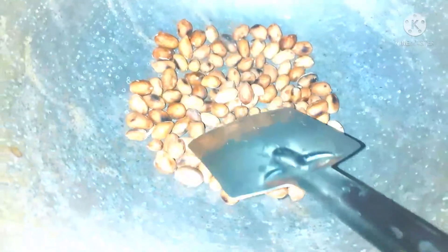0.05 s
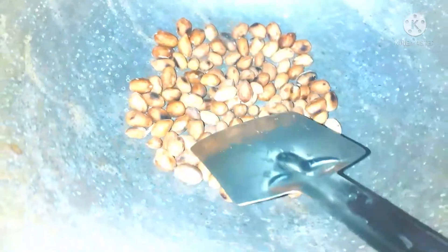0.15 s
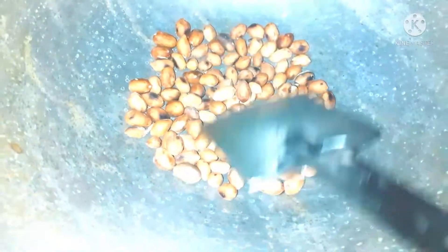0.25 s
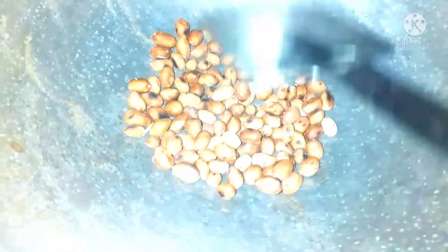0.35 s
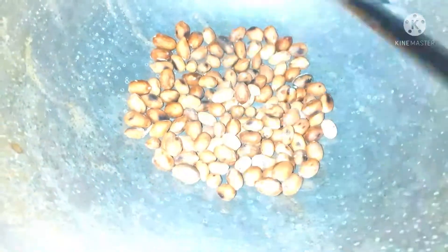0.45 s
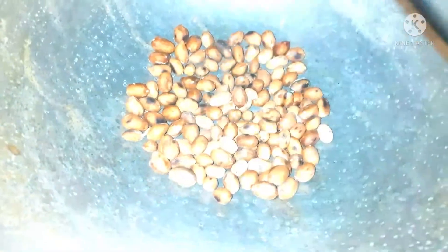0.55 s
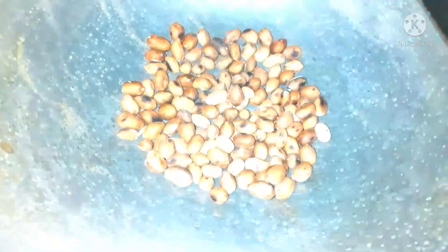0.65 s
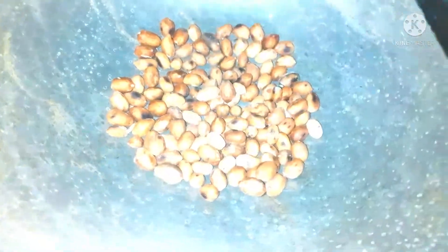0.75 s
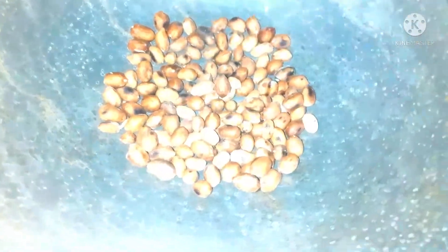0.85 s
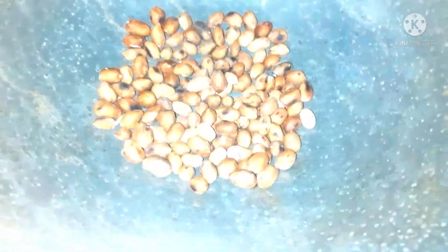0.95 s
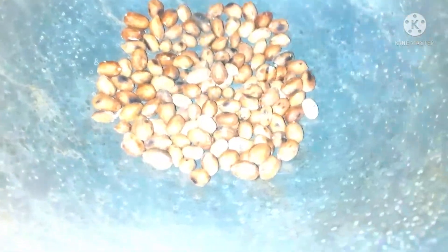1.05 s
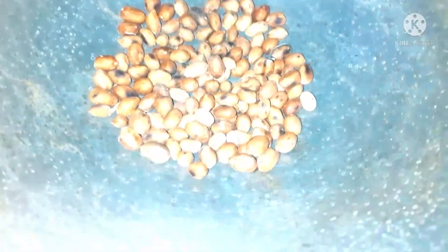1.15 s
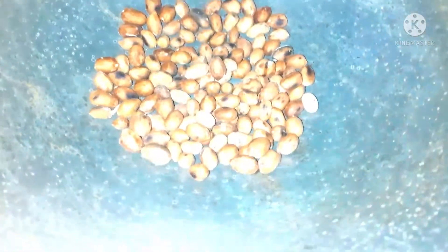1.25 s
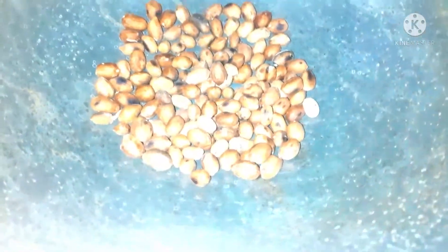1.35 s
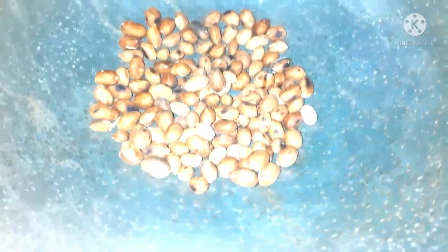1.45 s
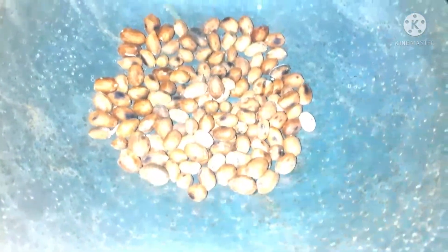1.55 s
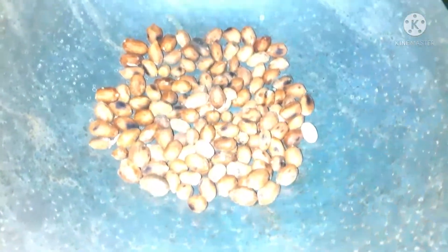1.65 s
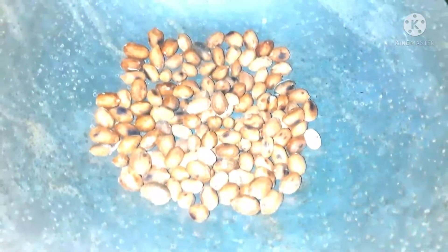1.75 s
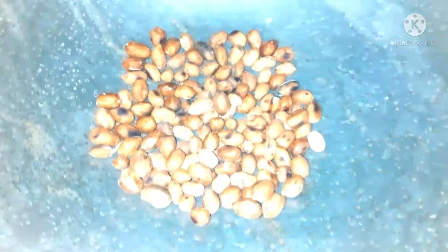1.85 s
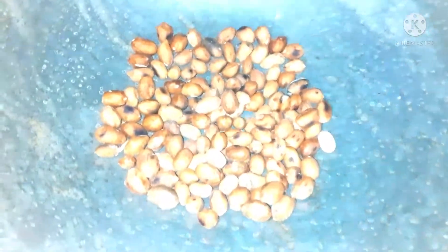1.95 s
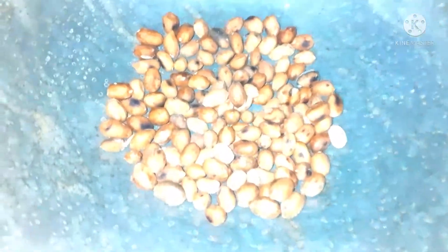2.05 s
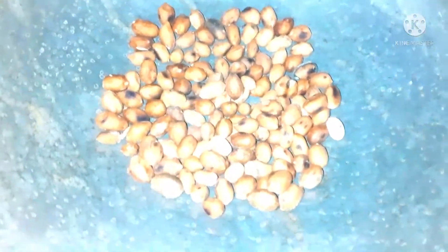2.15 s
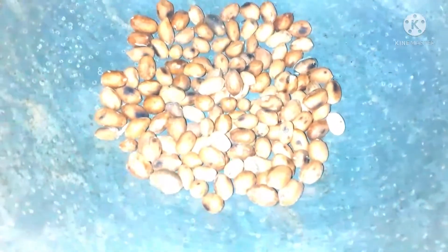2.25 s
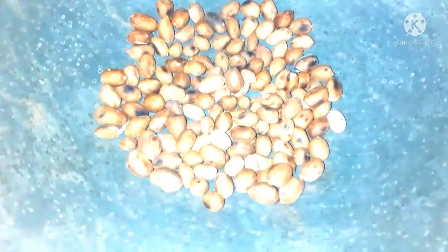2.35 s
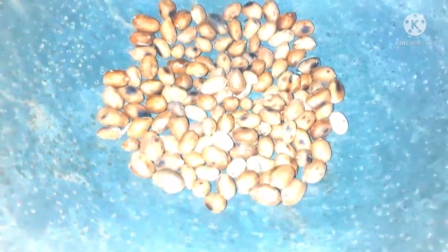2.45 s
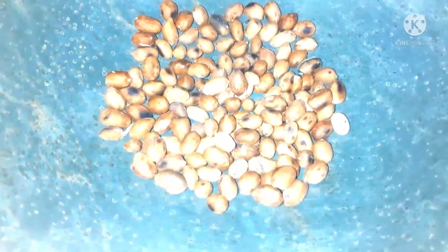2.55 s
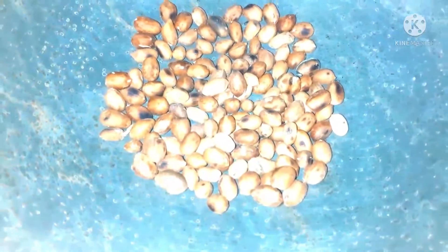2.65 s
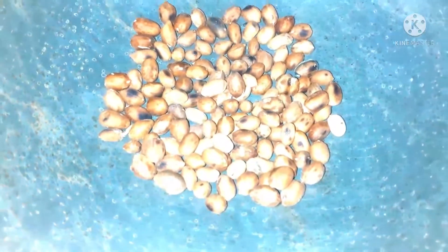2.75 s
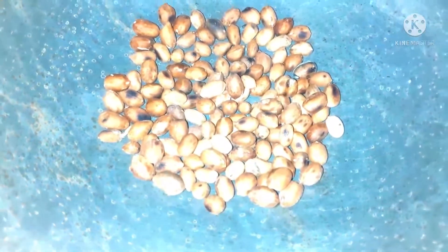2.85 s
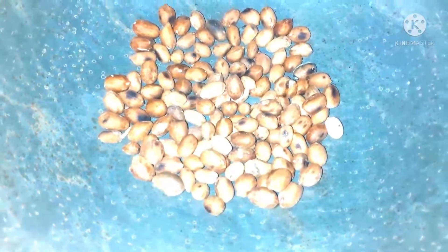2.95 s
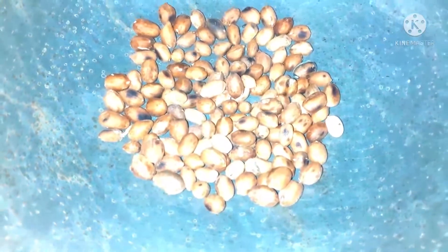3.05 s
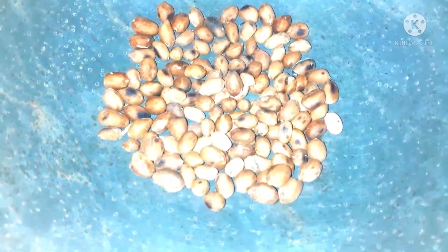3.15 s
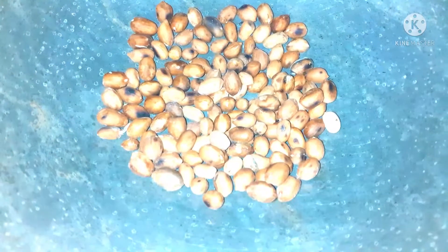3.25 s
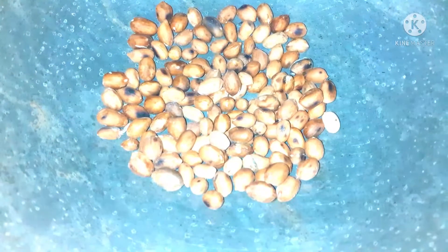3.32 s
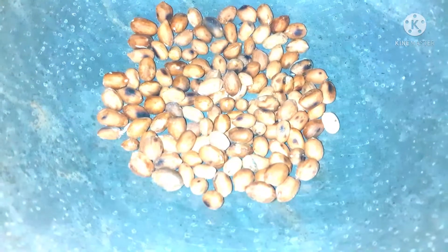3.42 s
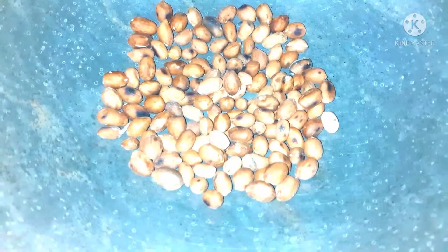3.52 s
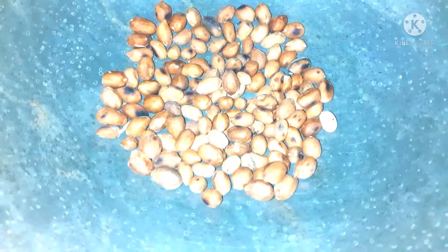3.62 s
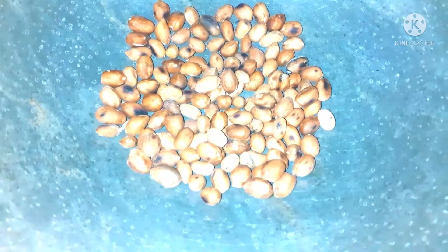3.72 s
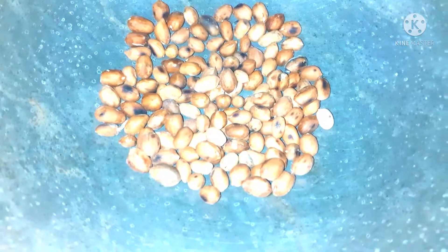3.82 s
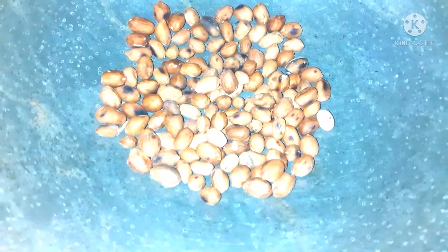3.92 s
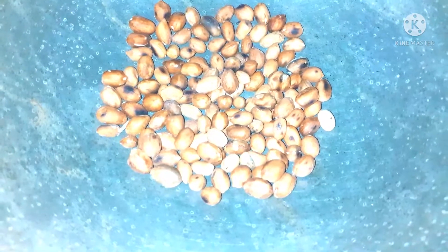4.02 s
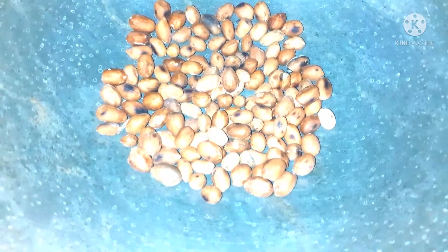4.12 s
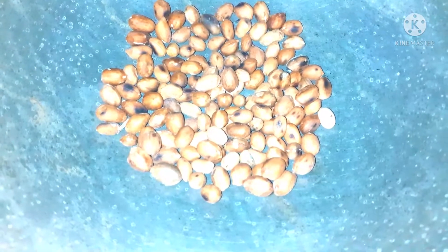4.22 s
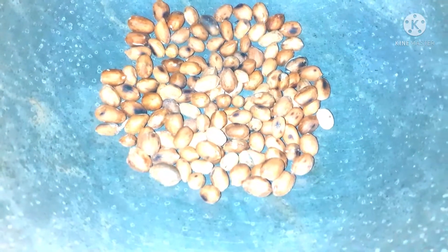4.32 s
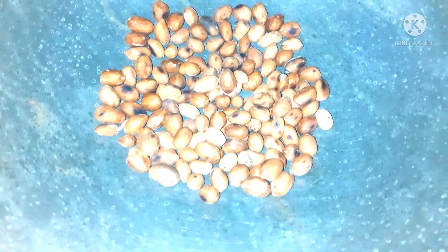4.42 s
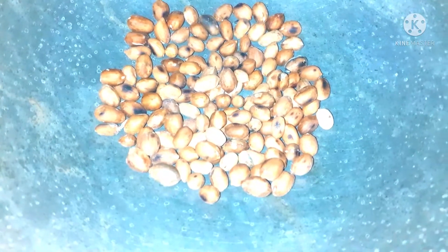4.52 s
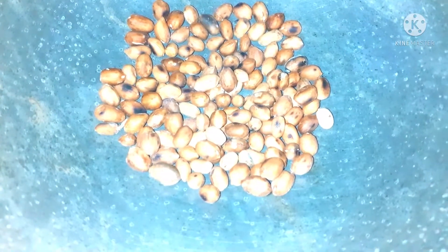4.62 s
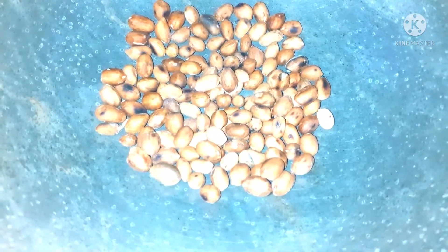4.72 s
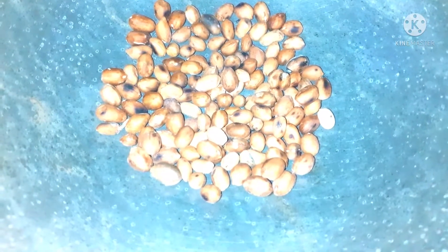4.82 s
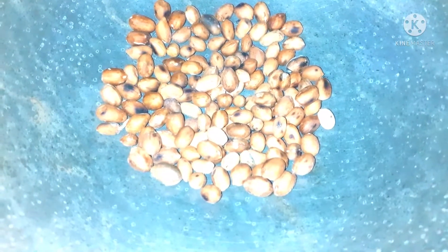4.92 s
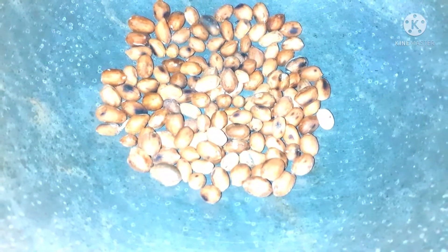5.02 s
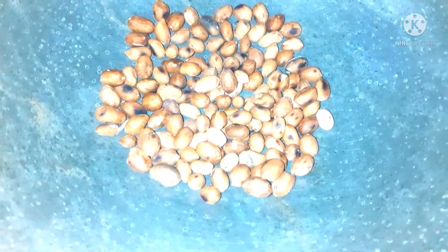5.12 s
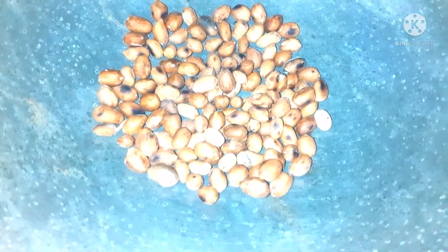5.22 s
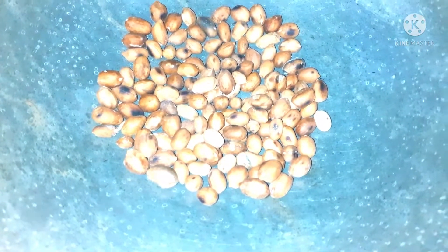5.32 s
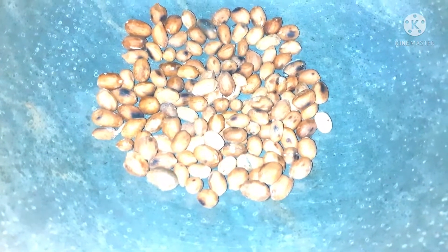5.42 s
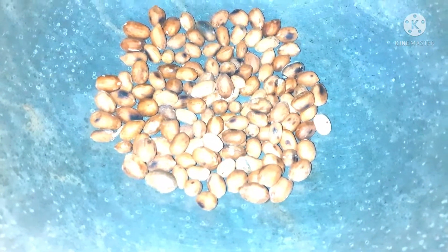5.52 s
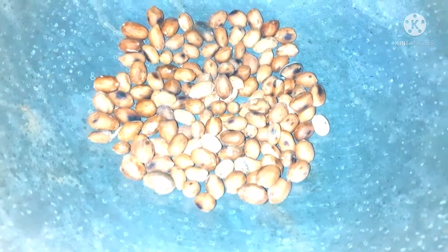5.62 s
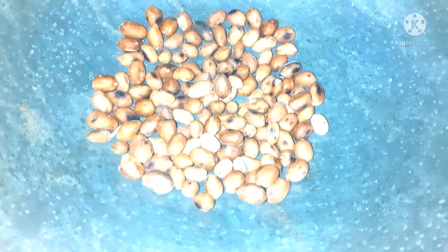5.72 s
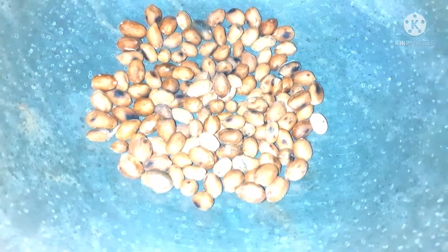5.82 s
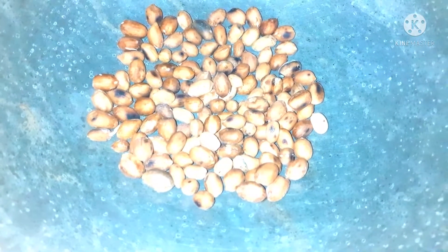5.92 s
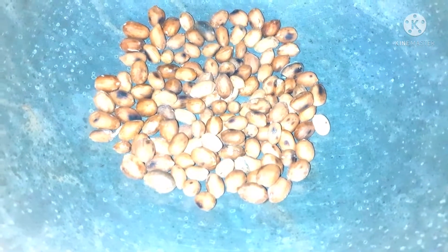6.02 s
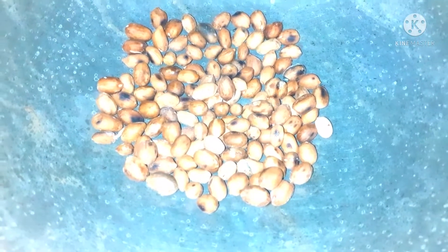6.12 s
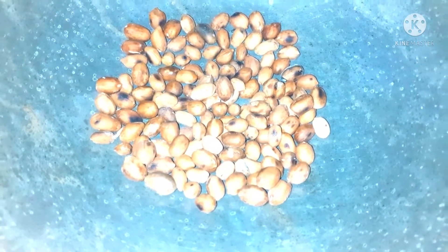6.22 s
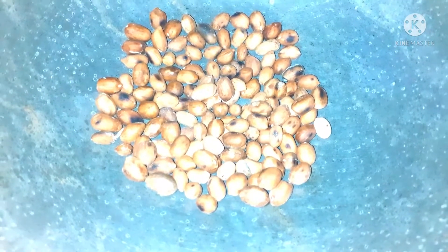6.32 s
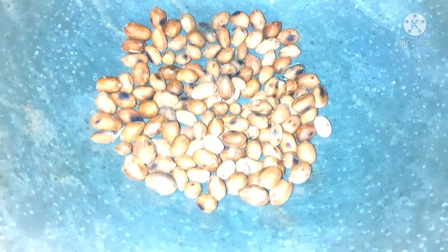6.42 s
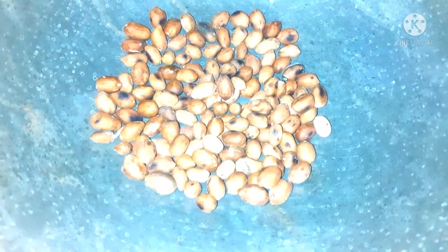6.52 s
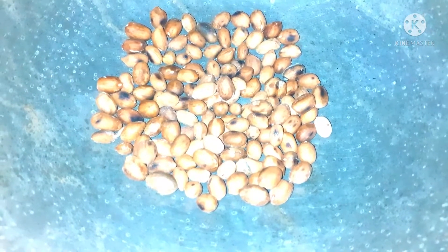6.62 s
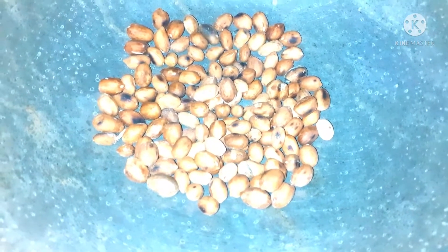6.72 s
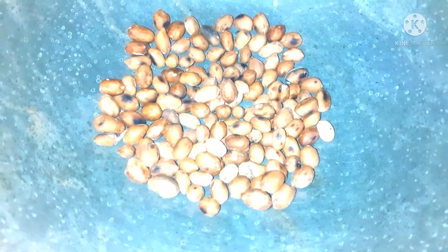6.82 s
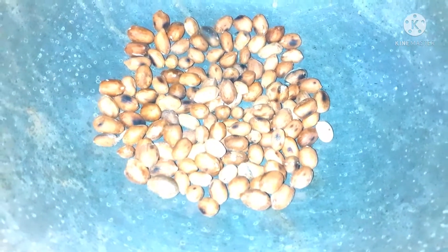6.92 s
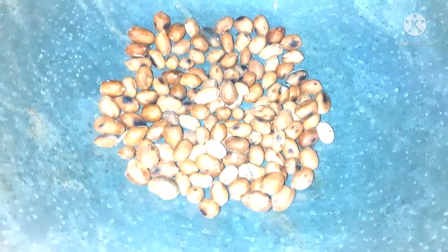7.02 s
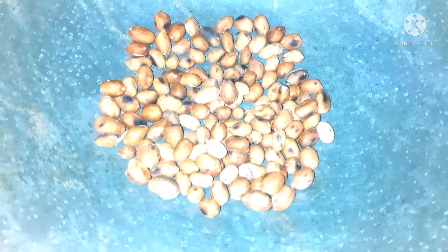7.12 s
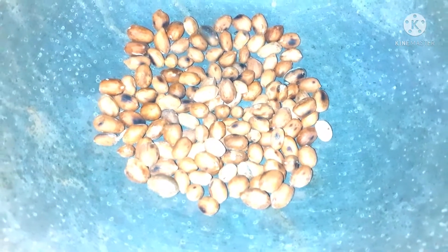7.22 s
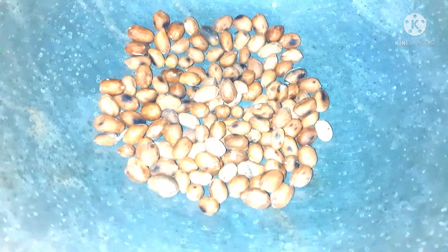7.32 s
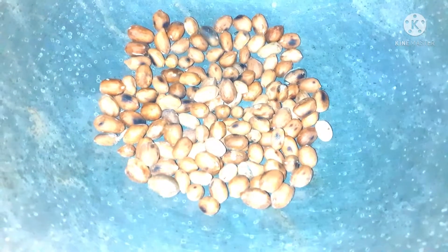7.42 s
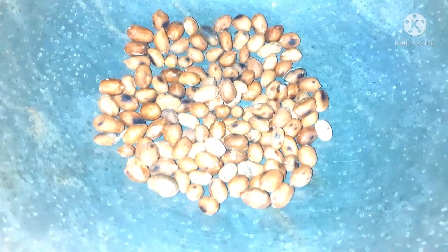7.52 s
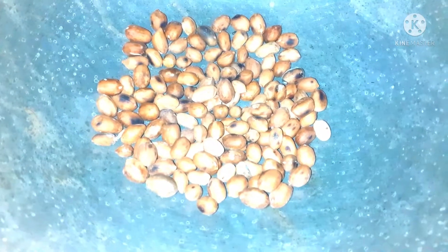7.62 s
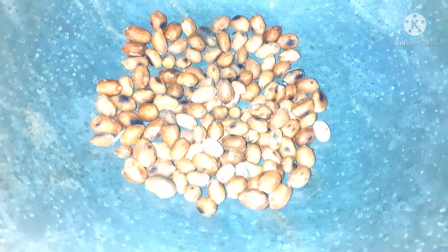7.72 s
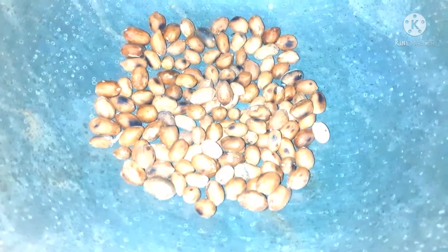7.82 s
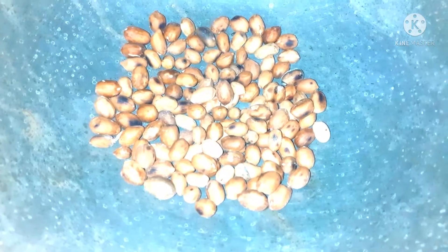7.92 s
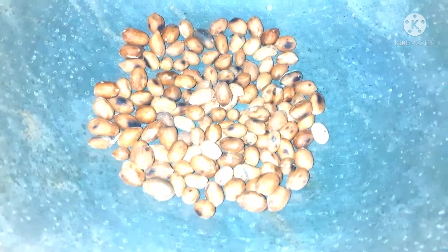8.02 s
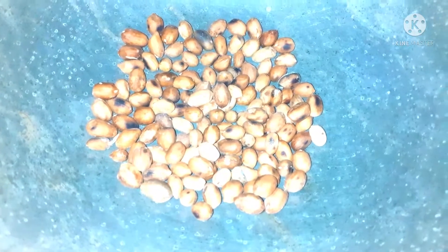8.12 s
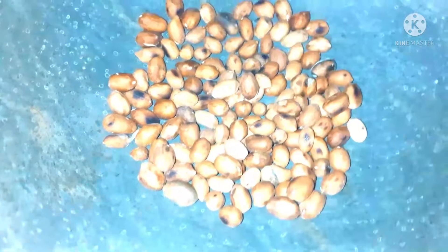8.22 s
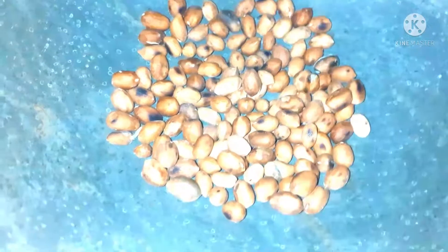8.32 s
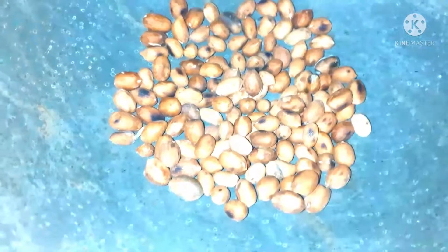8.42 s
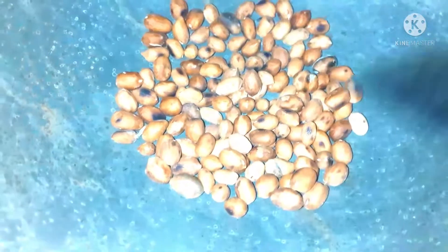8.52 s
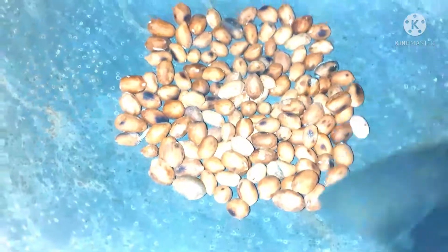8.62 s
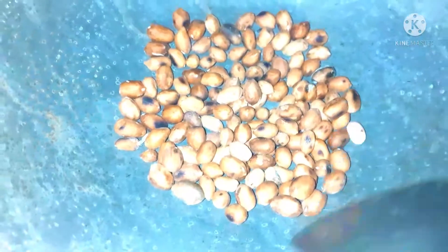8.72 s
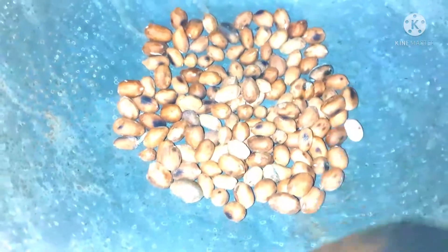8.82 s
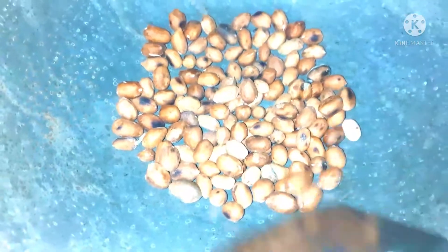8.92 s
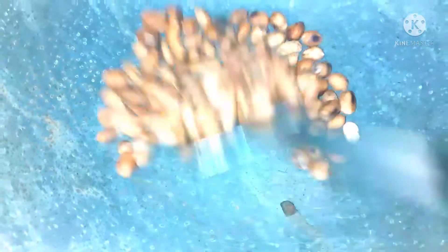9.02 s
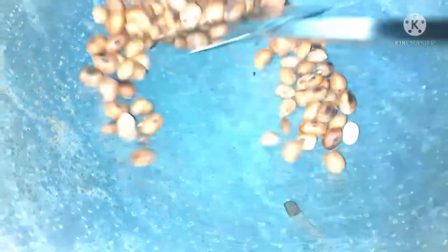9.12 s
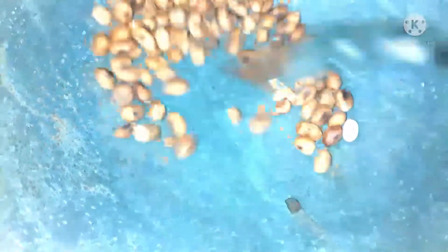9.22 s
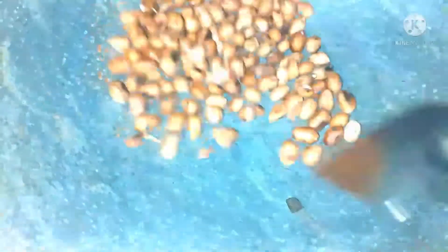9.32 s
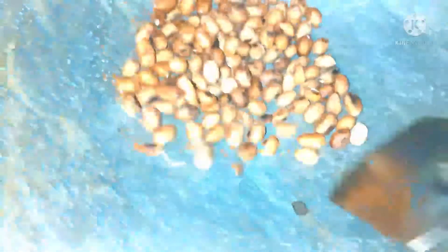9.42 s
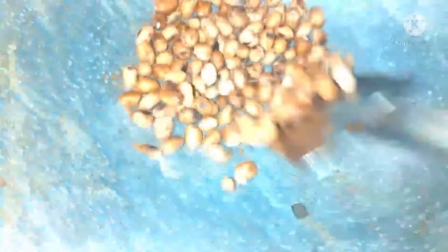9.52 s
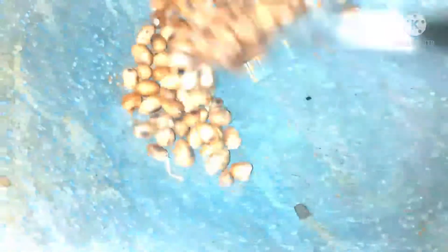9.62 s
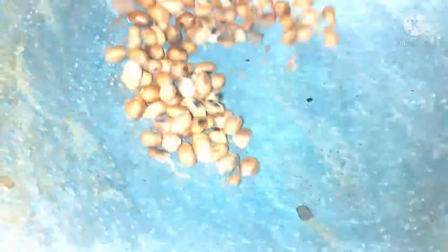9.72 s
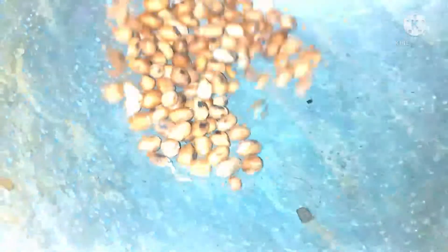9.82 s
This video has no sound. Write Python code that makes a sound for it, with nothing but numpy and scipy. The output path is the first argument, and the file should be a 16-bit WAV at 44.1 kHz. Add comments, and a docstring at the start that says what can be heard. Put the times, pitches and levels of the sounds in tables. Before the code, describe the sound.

Brief metallic clatter, a long quiet stretch of sharp nut pops, soft burner flutter and faint clock ticks, then loud scraping and stirring of nuts.

```python
"""A metal spatula lifts, lays down, drags and stirs roasting peanuts: random clicks and knocks ring its metal.
Nut skins crack with the heat as snaps of coloured noise, single nuts thump the dry pan, and the pan murmurs.
A gas flame flutters low as a train of soft pulses with pitched puffs, and a wall clock clicks with short noise.
Outside are crickets (narrow noise in chirps) and a bird (gliding sines); room hiss lies under it all.
The kitchen walls echo most sounds, and two microphone ports favour different bands."""
import sys
import numpy as np
from scipy import signal
from scipy.fft import rfft, irfft
from scipy.io import wavfile
from scipy.ndimage import uniform_filter1d

SR = 44100
rng = np.random.default_rng(int(sys.argv[2]) if len(sys.argv) > 2 else 0)


def store_wav(level_fs):
    """Save 16-bit WAV to argv[1]."""
    pcm = np.round(np.clip(np.atleast_2d(level_fs), -1, 1) * 32767)
    wavfile.write(sys.argv[1], SR, pcm.T.astype(np.int16))


N = 434826  # length in samples

# Levels in the tables are in dB before the final mix. A t60 is the time in which a sound fades by 60 dB.


def undb(db):
    """Turn decibels into a gain."""
    return 10 ** (np.asarray(db, float) / 20)


def level(x, db):
    """Scale a sound to an average (rms) level in dB."""
    return x * undb(db) / np.sqrt(np.mean(x ** 2))


def fade(t, t60):
    """A natural decay: 60 dB down after t60 seconds."""
    return 1000. ** (-t / t60)


def band(x, lo_hz, hi_hz):
    """Keep only the frequencies between two edges."""
    return signal.sosfilt(signal.butter(2, [lo_hz, min(hi_hz, .45 * SR)], "band", fs=SR, output="sos"), x)


def split(x, *edges_hz):
    """Cut a sound into bands that add up to the whole."""
    lows = [signal.sosfiltfilt(signal.butter(3, hz, fs=SR, output="sos"), x) for hz in edges_hz]
    return [upper - lower for lower, upper in zip([0] + lows, lows + [x])]


def causal(log_gain):
    """Minimum-phase filter: the given gains, with nothing sounding before its cause."""
    c = irfft(log_gain)
    c[1:len(c) // 2] *= 2
    c[len(c) // 2 + 1:] = 0
    return irfft(np.exp(rfft(c)))[:len(c) // 2]


def on_bins(table):
    """Read a table of Hz and dB at 2049 evenly spaced frequencies."""
    hz, db = np.transpose(table)
    return np.interp(np.log(np.linspace(1, SR / 2, num=2049)), np.log(hz), db)


def colour(x, table):
    """Filter a sound to the tone colour in a table."""
    return signal.oaconvolve(x, causal(np.log(undb(on_bins(table)))))[:len(x)]


def ring(x, modes):
    """Let a sound drive resonances, each with its own pitch, width and peak gain."""
    return sum(undb(db) * signal.lfilter(*signal.iirpeak(hz, hz / width_hz, SR), x) for hz, width_hz, db in modes)


def narrow_noise(hz, width_hz):
    """Noise passed twice through one resonance, which leaves a wavering tone."""
    modes = [(hz, width_hz, 0)]
    return ring(ring(rng.standard_normal(N), modes), modes)


def curve(table, column):
    """Draw one column of a table as a line over time."""
    t = np.array(table)
    return np.interp(np.arange(N) / SR, t[:, 0], t[:, column])


def walk(n, rate):
    """Smooth random wandering with a spread near 1."""
    k = int(SR / rate)
    steps = np.repeat(rng.standard_normal(n // k + 1), k)
    return 1.285 * uniform_filter1d(uniform_filter1d(steps, k), k)[:n]


def add(track, s, x):
    """Mix a sound in at a time in seconds."""
    i = int(s * SR)
    track[..., i:i + x.shape[-1]] += x[..., :N - i]


def burst(t60, db, tone, lo_hz, hi_hz):
    """A decaying crack of coloured noise, scaled by its peak in one band."""
    t = np.arange(int(SR * t60) + 2048) / SR
    x = colour(rng.standard_normal(len(t)) * fade(t, t60), tone)
    return x * undb(db) / np.abs(band(x, lo_hz, hi_hz)).max()


# Tone colour of the room noise. Each row: frequency in Hz, relative strength in dB per Hz.
AIR_TONE = [(15, -52), (25, -22.5), (92, -5), (161, -2.5), (242, -9.5), (439, -34), (734, -26),
            (1290, -35.5), (4870, -37), (5570, -32.5), (6380, -45), (8360, -36), (9570, -48),
            (14000, -29.5), (16000, -42.5)]
AIR_DB = -75.5  # level between 330 Hz and 17 kHz


def air():
    """Steady room hiss and rumble, alike at both ports only in the bass."""
    shared, *own = [colour(rng.standard_normal(N), AIR_TONE) for _ in range(3)]
    x = band(shared, 20, 530) + np.array([band(k, 320, 18000) + 0.053 * k for k in own])
    return x * undb(AIR_DB) / np.std(band(x, 330, 17000))


ROOM_T60_S, ROOM_TREBLE_T60_S = 0.2, 0.19
ROOM_GAP_S = .013  # the echo swells in over this time
WALL_S, WALL_DB = 0.018, 6  # the nearest wall answers above the rest


def kitchen(x):
    """Walls answer after a short gap, as fading noise; the treble dies first."""
    t = np.arange(int(.6 * SR)) / SR
    n = rng.standard_normal((2, len(t)))
    low = band(n, 60, 3400)
    tail = low * fade(t, ROOM_T60_S) + (n - low) * fade(t, ROOM_TREBLE_T60_S)
    tail *= np.clip(t / ROOM_GAP_S, 0, 1) ** 2
    tail *= undb(WALL_DB * np.exp(-((t - WALL_S) / 0.0027) ** 2))
    return signal.oaconvolve(x, tail / np.sqrt(np.sum(tail ** 2) / 2), axes=1)[:, :N]


# Low pan modes that murmur on. Each row: frequency in Hz, width in Hz, relative gain in dB.
PAN_HUM = [(630, 48, 2.5), (860, 26, 3.5), (1122.6, 16, 1), (1646.4, 16, -1.5)]
MURMUR_START_S, MURMUR_END_S = 0.016, 5.1
MURMUR_DB, MURMUR_FADE_DB_PER_S = -76, -4  # level before the swells and the fade


def murmur():
    """An uneven mid-band murmur that fades away, with the pan's low modes humming."""
    t = np.arange(N) / SR - MURMUR_START_S
    on = (t > 0) & (t < MURMUR_END_S - MURMUR_START_S)
    hum = sum(ring(rng.standard_normal(N) * undb(8.9 * walk(N, 9)), [mode]) for mode in PAN_HUM)
    noise = level(band(rng.standard_normal(N), 470, 1040), MURMUR_DB) * undb(3.1 * walk(N, 14))
    return on * (noise + level(hum, MURMUR_DB + 3.5)) * undb(MURMUR_FADE_DB_PER_S * t)


# A high and a low cricket. Each row: time in seconds, number of chirps so far.
HIGH_CHIRPS = [(1.808, 0), (3.492, 10), (6.088, 25), (6.974, 30), (8.685, 40), (8.95, 41.5)]
LOW_CHIRPS = [(1.52, 0), (3.68, 8)]


def cricket(chirps, hz, width_hz, duty, db):
    """Wing teeth ring a narrow band in regular chirps, blurred by distance."""
    phase = curve(chirps, 1)
    off = np.abs(phase - np.round(phase))  # distance from the middle of a chirp
    gate = np.clip((duty / 2 - off) / 0.26, 0, 1) * (phase > 0) * (phase < chirps[-1][1])
    return level(narrow_noise(hz, width_hz), db) * gate


# Bird notes. Each row: start in seconds, length in seconds, first pitch in Hz, last pitch in Hz,
# level in dB, octave overtone in dB relative to the note.
BIRD = [(1.68, 0.055, 847, 818, -72, -22), (1.88, 0.04, 876, 860, -72.5, -33),
        (2.205, 0.09, 1086, 1070, -65.5, -18), (3.066, 0.056, 864, 845, -70, -34),
        (3.168, 0.048, 848, 859, -72, -35), (3.291, 0.051, 873, 850, -72, -28.5),
        (3.264, 0.078, 4070, 4048, -73.5, -27.5), (3.647, 0.05, 1077, 1140, -59.5, -26),
        (4.3, 0.078, 3560, 3700, -76.5, -31.5), (4.41, 0.077, 3830, 3990, -77, -25),
        (5.065, 0.069, 750, 734, -70, -47), (6.846, 0.11, 734.6, 670, -71, -26),
        (7.016, 0.094, 790, 810, -69.5, -29), (7.199, 0.062, 2324, 2180, -69, -3),
        (7.799, 0.2, 2223, 1970, -74, -2), (8.228, 0.065, 2650, 2680, -70, -27)]


def bird():
    """Soft whistles far off: sines that glide in pitch, each with an octave overtone."""
    out = np.zeros(N)
    for s, length, hz0, hz1, db, over_db in BIRD:
        n = int(length * SR)
        # the pitch wavers, which makes the whistle breathy
        pitch = np.linspace(hz0, hz1, n) * (1 + .025 * walk(n, 200))
        turn = 2 * np.pi * np.cumsum(pitch) / SR
        whistle = np.sin(turn) + undb(over_db) * np.sin(2 * turn)
        add(out, s, undb(db + 2 * walk(n, 75)) * np.hanning(n) * whistle)
    return out


# Strength of the flutter. Each row: time in seconds, level in dB.
FLAME = [(0.0, -53), (0.22, -61), (1.19, -52.5), (1.24, -46.5), (1.67, -63), (3.5, -63.5), (4.06, -60),
         (5.82, -62.5), (5.89, -49.5), (6.0, -58.5), (6.73, -70.5), (7.53, -66), (8.79, -65), (9.01, -51.5),
         (9.23, -59.5), (9.86, -57.5)]
# Louder puffs. Each row: start in seconds, peak in dB, pitch in Hz.
PUFFS = [(2.04, -41, 208.6), (2.454, -48.5, 162.6), (2.692, -49, 158.3), (3.751, -40.5, 191.1),
         (4.15, -41.5, 171.5), (4.506, -49.5, 156.6), (4.609, -44.5, 191), (4.642, -36, 224),
         (5.06, -37, 174.7), (5.0861, -40.5, 200.6), (5.606, -51, 162.4), (5.872, -32, 85.7),
         (6.364, -36.5, 345), (6.606, -37, 234), (6.63, -47, 220), (6.67, -43, 166.6), (7.578, -44.5, 173),
         (7.682, -41, 167.3), (7.794, -46.5, 148.8), (8.563, -48, 161.7)]
# What the flutter sets ringing. Each row: frequency in Hz, width in Hz, relative gain in dB.
FLAME_RING = [(105, 38, 2.5), (148, 40, 3.5), (223.3, 18, 1.5), (306, 40, -20.5)]
FLAME_HZ, PUFF_RISE_S = 54.48, .005
FLARE_DB, FLARE_T60_S = -13, 0.2  # the flutter swells with a puff, this far under it, and settles


def flame():
    """The burner flutters about 54 times a second, strong and weak in turn, every pulse with its own strength."""
    timing, force = rng.standard_normal((int(N / SR * 70), 2)).T
    at = (np.cumsum(1 + 0.046 * timing) * SR / FLAME_HZ).astype(int)
    force_db = 4.0 * force + 3.0 * (-1.) ** np.arange(len(at))
    pulses, out = np.zeros(N), np.zeros(N)
    pulses[at[at < N]] = undb(force_db)[at < N]
    strength = undb(curve(FLAME, 1))
    t = np.arange(SR // 2) / SR
    rise = np.sin(np.pi / 2 * np.minimum(t / PUFF_RISE_S, 1)) ** 2
    for s, db, hz in PUFFS:
        hump = np.exp(-((t - .011) * hz / 0.513) ** 2)
        add(out, s, rise * undb(db) * np.sin(2 * np.pi * hz * t) * hump)
        add(strength, s, rise * undb(db + FLARE_DB - 60 * t / FLARE_T60_S))
    flutter = band(band(ring(pulses, FLAME_RING), 48, 370), 40, 410)
    return out + strength * level(flutter, -2.5)


# Tone colour of a tick. Each row: frequency in Hz, relative strength in dB per Hz.
TICK_TONE = [(530, -30), (900, -28), (1180, -6), (1460, -28.5), (2700, 0), (3300, -2), (3840, -7.5),
             (5500, -4), (6230, -14), (10000, -25), (13000, -64), (22000, -120)]
FIRST_TICK_S, TICK_GAP_S, TOCK_LATE_S = 2.012, .9994, .002
TICK_DB, TOCK_DB, TICK_RISE_S = -52.5, -48, 0.0055  # peaks from 1.1 to 7.7 kHz, before the soft rise


def clock():
    """The escapement clicks about once a second across the room, tick and tock in turn."""
    out = np.zeros(N)
    for k in range(8):
        x = burst(0.098, (TICK_DB, TOCK_DB)[k % 2], TICK_TONE, 1100, 7700)
        rise = np.minimum(np.arange(len(x)) / SR / TICK_RISE_S, 1)
        add(out, FIRST_TICK_S + k * TICK_GAP_S + k % 2 * TOCK_LATE_S, x * rise)
    return out


# The counter hums under the handle. The row: middle in seconds, spread in seconds, pitch in Hz,
# width in Hz, level at the middle in dB.
THUD = (1.265, .05, 108, 25, -45)


def thud():
    """A short low hum of the worktop: narrow noise that swells and sinks."""
    s, spread, hz, width_hz, db = THUD
    return level(narrow_noise(hz, width_hz), db) * np.exp(-((np.arange(N) / SR - s) / spread) ** 2)


# Single nuts fall back on the pan floor. Each row: time in seconds, starting strength in dB.
BUMPS = [(9.267, -33), (9.2862, -29.5), (9.3187, -28), (9.3475, -35)]


def bumps():
    """Each nut thumps the pan's low mode, a sine that dies quickly."""
    out, t = np.zeros(N), np.arange(SR // 10) / SR
    for s, db in BUMPS:
        add(out, s, undb(db) * np.sin(2 * np.pi * 790 * t) * fade(t, .035))
    return out


# Snapping skins. Each row: time in seconds, peak from 1.5 to 10 kHz in dB, the part below 1.5 kHz and the part
# above 10 kHz in dB against it, left minus right in dB, shreds in dB against the snap.
POPS = [(0.2105, -27.5, -22, -1, -2, -23), (3.6295, -14.5, -28, -5.5, -1.5, -32),
        (4.8431, -19.5, -32, 10.5, -0.5, -21.5), (5.8773, -18.5, -18.5, 4, 1, -14),
        (6.015, -35.5, -24, 0, -2.5, -23), (6.294, -44.5, -4, 0, -1, -6), (8.108, -58, 5.5, -33, -2, -18),
        (8.337, -10.5, -24.5, -7, -3, -21.5), (8.5098, -30, -15, -23.5, -3, -33)]
# Tone colour of a snap. Each row: frequency in Hz, relative strength in dB per Hz.
POP_TONE = [(180, -58), (300, -17.5), (1090, -17), (1270, -22), (3300, 2.5), (4900, -0.5), (6140, 1.5),
            (8500, 3), (9980, -5.5), (13000, 7.5), (15200, 3), (16500, -8.5)]
# Tiny dry crackles. Each row: time in seconds, peak from 5.9 to 8.45 kHz in dB.
CRACKLES = [(3.309, -63), (4.8188, -49), (5.2824, -67), (5.3049, -63.5), (5.4374, -61.5), (5.4758, -60),
            (5.552, -60), (5.5759, -59), (5.6853, -59.5), (8.064, -57.5), (8.238, -59), (8.2812, -58),
            (8.7155, -65)]


def pops():
    """Each skin snaps in an instant, the pan wall throws it back, and shreds crackle after it."""
    out = np.zeros((2, N))
    snap = colour(signal.unit_impulse(2048), POP_TONE)
    snap /= np.abs(band(snap, 1500, 9670)).max()
    for s, db, low_db, high_db, pan_db, shreds_db in POPS:
        x = np.zeros(SR // 5)
        for late_s, gain_db in (.001, 1), (.0024, -21):  # the snap, then its echo
            add(x, late_s, undb(gain_db) * snap)
        add(x, .0012, burst(0.013, -8.0, POP_TONE, 1700, 8900))
        shreds = burst(0.15, shreds_db, POP_TONE, 1500, 13000)
        add(x, .003, shreds * undb(3.8 * walk(len(shreds), 200)))
        parts = split(x, 1500, 10000)
        x = sum(p * undb(db + d) / np.abs(p).max() for p, d in zip(parts, (low_db, 0, high_db)))
        add(out, s, x * undb([[pan_db / 2], [-pan_db / 2]]))
    crackle_tone = [(3000, -18.5), (7000, -10.0), (8600, 9.5), (10000, -23.0)]
    for s, db in CRACKLES:
        add(out, s, burst(0.0088, db, crackle_tone, 5900, 8450))
    return out


# The spatula's edge catches. Each row: start in seconds, length in seconds, pitch in Hz, level in dB.
CATCHES = [(0.0, 0.038, 2190, -55), (0.474, 0.11, 383, -51.5), (.45, 0.15, 905, -57),
           (0.721, 0.088, 410, -55), (0.718, 0.093, 902, -60), (0.746, 0.064, 1086, -53),
           (0.945, 0.019, 2270, -38), (1.0492, 0.016, 6140, -28), (1.0492, 0.012, 8420, -26.5),
           (1.06, 0.13, 1148, -48), (1.194, 0.09, 365, -40), (1.229, 0.05, 2660, -37),
           (1.256, 0.051, 2270, -39), (1.4225, 0.011, 2700, -20), (7.211, 0.2, 2980, -72.5),
           (7.254, 0.22, 4600, -70.5), (8.948, 0.19, 2265, -39.5), (8.975, 0.058, 6510, -27),
           (8.996, 0.043, 5150, -25), (8.998, 0.099, 3374, -24.5), (9.005, 0.037, 8252, -29),
           (9.055, 0.049, 4880, -25.5), (9.424, 0.12, 2240, -40.5), (9.428, 0.021, 6220, -34),
           (9.452, 0.089, 788, -40.5), (9.495, 0.051, 4920, -33.5), (9.528, 0.083, 3350, -31.5),
           (9.545, 0.036, 8350, -33), (9.615, 0.05, 2267, -35)]
CATCH_WIDTH_HZ, CATCH_RATE = 25, 1500.  # least width; average slips per second
CATCH_GRIP = 2.5  # a brief catch is damped harder: least width in Hz times length in s


def catches():
    """Uneven slips of the dragged edge ring a single resonance, which sounds on briefly."""
    out = np.zeros(N)
    for s, length, hz, db in CATCHES:
        n = int(length * SR)
        slips = (rng.random(SR // 5) < CATCH_RATE / SR) * rng.standard_normal(SR // 5)
        progress = np.clip(np.arange(SR // 5) / n, 0, 1)
        slips *= np.sqrt(np.sin(np.pi * progress ** .6) + 1e-12)
        x = ring(slips, [(hz, max(CATCH_WIDTH_HZ, CATCH_GRIP / length), 0)])
        add(out, s, x * undb(db) / np.std(x[:n]))
    return out


# Thin tones of the free blade. Each row: pitch in Hz, relative strength in dB, t60 in seconds.
BLADE = [(2433, 0, .16), (4468, -5, .13), (5303, -13, .42), (5706, -2, .28), (6309, -8, .18),
         (7219, -15, .31), (7736, -16, .36), (8064, -2, .4), (8511, -12, .4), (8290, -6, .35),
         (8915, -9, .23)]


def blade_song():
    """The free blade sings as a chord of fading sines."""
    t = np.arange(SR // 2) / SR
    return sum(undb(db) * np.sin(2 * np.pi * hz * t) * fade(t, t60) for hz, db, t60 in BLADE)


# Metal knocks. Each row: time in seconds, peak of the rattle in dB, rattle t60 in seconds,
# blade song in dB against that peak.
KNOCKS = [(.485, -46, 0.16, -45), (0.9412, -30, 0.064, -28), (1.0478, -9.5, 0.019, -34),
          (1.2166, -39, 0.07, -33), (1.2656, -18, 0.043, -40), (1.4205, -11, 0.025, -18),
          (1.4281, -13, 0.09, -41), (6.366, -24.5, 0.11, -45), (6.402, -26, 0.1, -47),
          (6.432, -29, 0.05, -45), (7.2084, -60.5, 0.22, -32.5), (8.8873, -21.5, 0.12, -26),
          (8.9046, -20, 0.3, -25.5), (8.9494, -14, 0.19, -20.5), (9.012, -12, 0.036, -45),
          (9.027, -9.5, 0.03, -45), (9.046, -13, 0.042, -45), (9.079, -14.5, 0.026, -45),
          (9.247, -29, 0.066, -45), (9.4315, -12.5, 0.073, -21), (9.4404, -11, 0.023, -46),
          (9.474, -16.5, 0.044, -45), (9.503, -14.5, 0.029, -45), (9.530, -15.5, 0.043, -35),
          (9.563, -16.5, 0.052, -45), (9.586, -21, 0.039, -45), (9.7617, -30.5, 0.12, -20),
          (9.847, -52, 0.054, -45)]
KNOCK_RISE_S = .0025


def knocks(out, start_s, end_s, tone, modes, ring_db):
    """Add the blows within one stroke: a short noisy rattle rings the metal and the blade sings on."""
    t, song = np.arange(SR // 2) / SR, blade_song()
    for s, peak_db, t60, blade_db in KNOCKS:
        if not start_s <= s < end_s:
            continue
        rattle = rng.standard_normal(len(t)) * fade(t, t60) * np.minimum(t / KNOCK_RISE_S, 1)
        # each blow lands elsewhere and favours other resonances
        favour_db = 4.4 * rng.standard_normal(len(modes))
        favoured = [(hz, width_hz, db + f) for (hz, width_hz, db), f in zip(modes, favour_db)]
        hit = colour(rattle, tone) + undb(ring_db) * ring(rattle, favoured)
        add(out, s, hit * undb(peak_db) / np.abs(hit).max())
        add(out, s, undb(peak_db + blade_db) * song)


# Spatula strokes. Each row: motion, three offsets in dB (boom below 1.3 kHz, clang up to 2.6 kHz, brightness
# above 5.5 kHz), then the pressure as points of time in seconds and level in dB.
STROKES = [ ("lift", (-2.2, -1.5, -1.2), [(0.0, -57), (0.196, -83), (0.334, -87.5)]),
           ("lift", (-8, -15, -10), [(0.335, -86), (0.412, -66), (0.5, -60), (0.672, -81)]),
           ("lift", (-5.5, -8.5, -4), [(0.673, -84), (0.77, -63), (0.85, -70.5), (0.935, -60.5)]),
           ("lay", (7, 1.3, 0), [(0.941, -66), (0.945, -50.5), (1.045, -58)]), ("lay", (0, 0, 5.8),
           [(1.046, -50), (1.05, -60), (1.065, -50), (1.12, -45), (1.2, -52)]), ("lay", (0.14, -4.5, -7),
           [(1.201, -41), (1.221, -29), (1.29, -36), (1.417, -63)]), ("lay", (-6, -12, 8.8), [(1.418, -42),
           (1.421, -49), (1.43, -26), (1.493, -59.5), (1.69, -89.5)]), ("drag", (-11.5, -13.5, -1.5),
           [(6.22, -82.5), (6.284, -56), (6.355, -54), (6.39, -46.5), (6.502, -50), (6.642, -69),
           (6.75, -94)]), ("drag", (-46, -19.5, 0), [(7.18, -99), (7.212, -72.5), (7.368, -73.5),
           (7.45, -90), (7.55, -99)]), ("stir", (0, -2, 0.72), [(8.886, -53), (8.89, -67), (8.94, -71),
           (8.984, -35.5), (9.016, -25.5), (9.092, -26), (9.136, -51), (9.226, -53)]),
           ("stir", (0.19, -17, -7.5), [(9.227, -56), (9.286, -42.5), (9.429, -59)]),
           ("stir", (-1.5, -1.6, 0.31), [(9.43, -51.5), (9.436, -35), (9.465, -43.5), (9.563, -26),
           (9.635, -48), (9.72, -59)]), ("stir", (5.5, -0.74, 1.2), [(9.721, -60.5), (9.77, -53.5),
           (9.813, -51.5), (9.86, -45.5)]), ]
# How the bands hold up as pressure drops. For each motion: dB kept per dB lost in boom, clang and brightness.
KEEPS = {"lift": (0.51, 0.114, 0.056), "lay": (0.24, 0.17, 0.033), "drag": (0.36, 0.032, 0.08),
         "stir": (0.66, 0.22, 0.18)}
FIRM_DB = -40  # the pressure at which the offsets hold as listed


def spatula(motion, tone, modes, ring_db, rate, spread_db, shift_db, apart, minor_db):
    """Nuts and blade give dense uneven clicks that ring the metal; knocks add short rattles."""
    out = np.zeros((2, N))
    # besides its main resonances the metal has many minor ones
    minor_hz = 1500 * 2 ** rng.uniform(0, 3.2, size=24)
    minor = [(hz, 30, minor_db + np.interp(hz, *np.transpose(tone))) for hz in minor_hz]
    for name, bands_db, pressure in STROKES:
        if name != motion:
            continue
        start_s, end_s = pressure[0][0], pressure[-1][0]
        a, b = int(start_s * SR), min(int(end_s * SR), N)
        lead = SR // 20  # the metal already rings when the stroke is first heard
        n = b - a + lead
        sizes = undb(spread_db * np.minimum(rng.exponential(size=(3, n)), 3))
        clicks = (rng.random((3, n)) < rate / SR) * rng.standard_normal((3, n)) * sizes
        clicks *= undb(1.3 * walk(n, 120))  # nuts tumble in bunches
        # contacts lie all over the pan, so each port hears some of them alone
        clicks = clicks[0] + apart * band(clicks[1:], 440, 22000)
        rub = np.array([colour(c, tone) for c in clicks])
        for mode in modes + minor:
            # the moving contact point drives each resonance now strongly, now weakly
            rub += undb(ring_db) * ring(clicks * undb(shift_db * walk(n, 45)), [mode])
        db = np.interp(np.arange(a, b) / SR, *np.transpose(pressure))
        boom, clang, bright = (d + k * (FIRM_DB - db) for d, k in zip(bands_db, KEEPS[motion]))
        parts = [p[:, lead:] for p in split(rub, 1300, 2600, 5500)]
        edge = signal.windows.tukey(b - a, .006 * SR / (b - a))  # soft start and end
        out[:, a:b] += edge * sum(undb(db + d) * level(p, 0) for p, d in zip(parts, (boom, clang, 0, bright)))
        knocks(out, start_s, end_s, tone, modes, ring_db)
    return out


# Tone colour of lifting and dragging. Each row: frequency in Hz, relative strength in dB per Hz.
DRAG_TONE = [(120, -45), (200, -17), (360, -3.5), (579, -7), (899, -14.5), (1120, -20), (1450, -25),
             (1810, 0.5), (2700, 4), (4300, -2.5), (5200, -9.5), (8270, -17.5), (9750, -30), (13800, -12),
             (16000, -31.5)]
# Resonances while the blade leaves the pan, then while it drags.
# Each row: frequency in Hz, width in Hz, relative gain in dB.
LIFT_RING = [(355.3, 25, -4.5), (602, 47, -16), (885, 33, -4), (1700, 26, -17.5), (2445, 270, -15),
             (3800, 790, -9)]
DRAG_RING = [(370, 34, 4.5), (1131, 36, -3), (1852, 23, 1), (2560, 110, 1), (3490, 44, 1), (4090, 45, 5.5),
             (5570, 41, -9), (7400, 39, -6), (8200, 86, -11)]


def lift_and_drag():
    """The blade leaves the pan and later drags: the same click colour, other resonances."""
    return sum(spatula(motion, DRAG_TONE, modes, 3.9, rate=3000.0, spread_db=0.5, shift_db=3.0,
                       apart=0.79, minor_db=0.5)
               for motion, modes in (("lift", LIFT_RING), ("drag", DRAG_RING)))


# Tone colour of laying down. Each row: frequency in Hz, relative strength in dB per Hz.
LAY_TONE = [(120, -37.5), (200, -24.5), (360, -5), (558, -14), (763, -1.5), (1530, -16.5), (2650, 2),
            (4860, -5.5), (6050, -0.5), (8270, -10.5), (9750, -24.5), (14300, -9), (16000, -28.5)]
# Its resonances. Each row: frequency in Hz, width in Hz, relative gain in dB.
LAY_RING = [(369.5, 8.8, -4.5), (765, 96, -10), (2300, 80, -0.5), (1133, 89, -10), (6110, 45, -3.5),
            (6700, 40, -8.5), (8180, 130, -1),]


def lay():
    """The spatula is laid down, its clicks strongly ringing the metal."""
    return spatula("lay", LAY_TONE, LAY_RING, 8.3, rate=3000.0, spread_db=2.5, shift_db=5.5,
                   apart=0.94, minor_db=-0.5)


# Tone colour of stirring. Each row: frequency in Hz, relative strength in dB per Hz.
STIR_TONE = [(120, -53), (200, 6.5), (749, -4), (1530, -8), (2210, -5.5), (3020, 8), (3310, 6), (4200, 2),
             (6520, 10), (8580, 1.5), (9750, -3), (11500, 5.5), (16000, 5.5)]
# Its resonances. Each row: frequency in Hz, width in Hz, relative gain in dB.
STIR_RING = [(757, 234, 6), (2227, 28, 10.5), (2716, 140, 4), (3390, 77, -7), (3860, 100, 5.5),
             (4530, 85, 9), (5050, 160, 3), (5900, 61, 12), (6200, 54, 2), (6380, 55, 12), (6600, 31, 12),
             (8320, 38, 16), (11720, 98, -4.5)]


def stir():
    """The nuts are stirred, with denser clicks and brighter resonances."""
    return spatula("stir", STIR_TONE, STIR_RING, 1.1, rate=4000., spread_db=3.0, shift_db=6.0,
                   apart=0.97, minor_db=-3.0)


def scene():
    """Loud sources, faint sources and the kitchen's echo of most of them."""
    metal = lay() + stir() + catches() + bumps()
    drag = lift_and_drag()
    snaps, ticks = pops(), clock()
    faint = bird() + murmur()
    faint += cricket(HIGH_CHIRPS, 5634, 180, 0.74, -79.0) + cricket(LOW_CHIRPS, 2810, 230, 0.91, -81)
    wet = kitchen(undb(-15.5) * metal + undb(-9.0) * drag + undb(-10.0) * snaps
                  + undb(-2.0) * ticks + undb(-1.5) * faint)
    loud = undb(-4.0) * metal + undb(-4) * drag + snaps
    return loud + ticks + faint + wet + undb(-1.0) * flame() + thud() + air()


# Air from a pop hits the left port. The row: start in seconds, strength in dB, pitch in Hz, t60 in seconds.
GUST = (5.878, -21, 52, .09)


def gust(out):
    """Add the low thud of the gust, a fading sine 21 dB weaker at the right port."""
    s, db, hz, t60 = GUST
    t = np.arange(SR // 5) / SR
    add(out, s, -undb([[db], [db - 21]]) * np.sin(2 * np.pi * hz * t) * fade(t, t60))


# How the ports differ. Each row: frequency in Hz, left minus right in dB.
PORTS = [(60, 11.5), (300, 6.5), (700, 8.5), (1100, 4), (1600, -2.5), (2200, -11.5), (3200, -12),
         (4500, -9), (6500, -14.5), (8300, -24), (9500, 0.5), (10500, -4.5), (12500, 10), (15500, 7)]
PORT_LAG = 6  # samples by which sound reaches the right port later
TOP_HZ = 15600


def record(dry):
    """Each port has its own colour; a gust thuds on the left one; peaks are rounded and the top is cut."""
    ratio = undb(on_bins(PORTS))
    right = 2 / np.sqrt(1 + ratio ** 2)  # the summed power of both ports stays even
    gains = (right * ratio, right)
    out = np.array([signal.oaconvolve(c, causal(np.log(g)))[:N] for c, g in zip(dry, gains)])
    out[1] = np.roll(out[1], PORT_LAG)
    gust(out)
    rounded = .8 * np.tanh(out / .8)
    return signal.sosfilt(signal.ellip(10, .2, 80, TOP_HZ, fs=SR, output="sos"), rounded)


dry = scene()
out = record(dry)
store_wav(out)
```